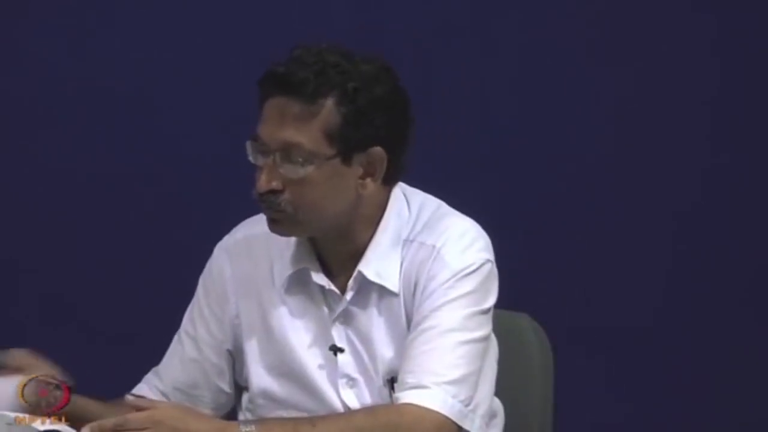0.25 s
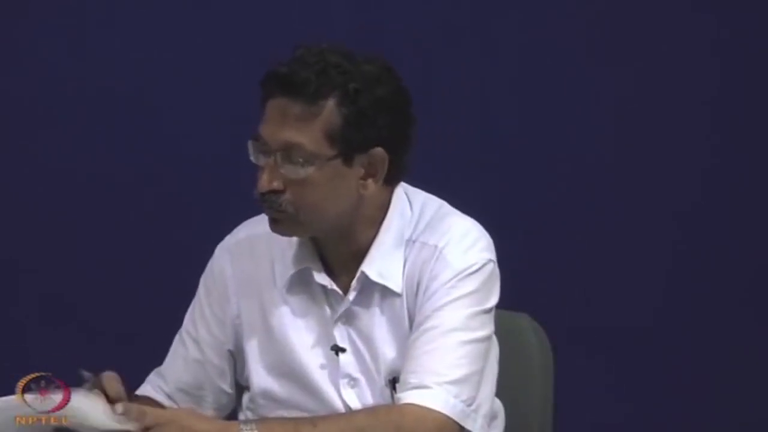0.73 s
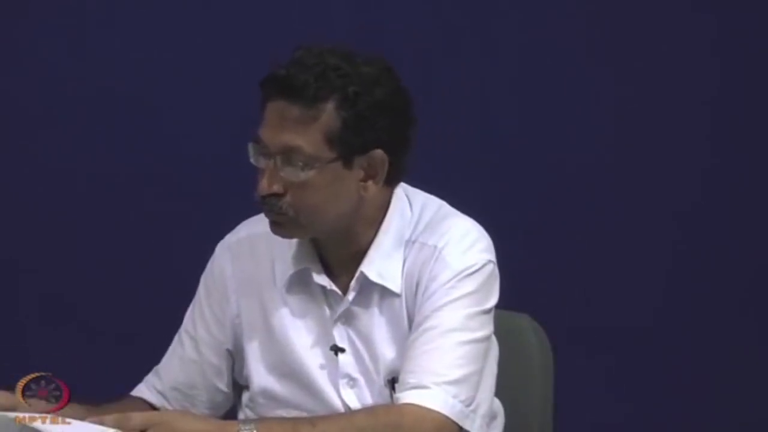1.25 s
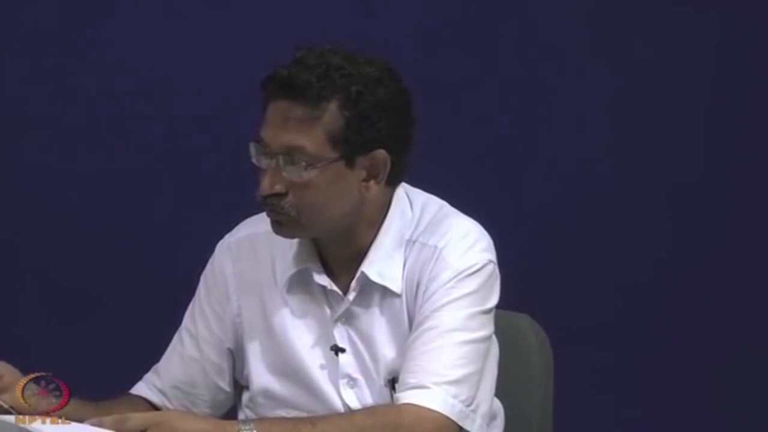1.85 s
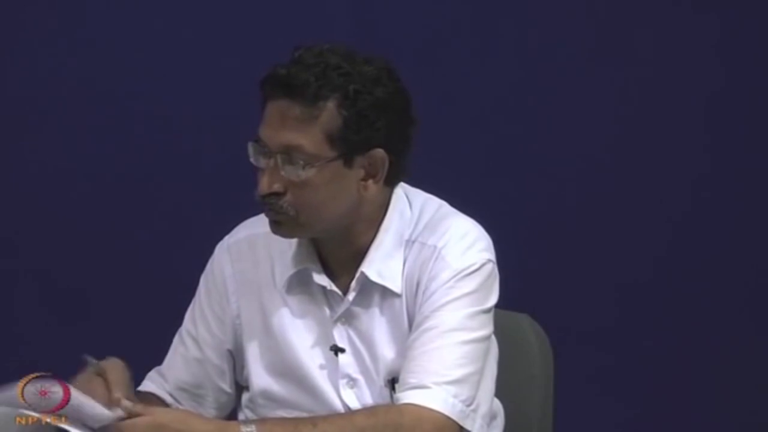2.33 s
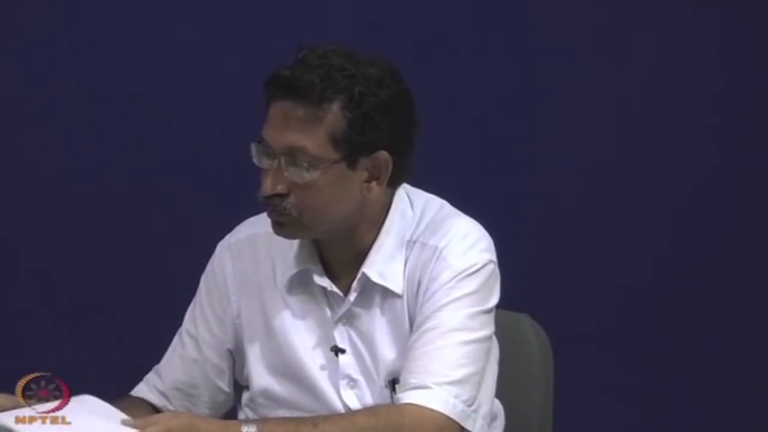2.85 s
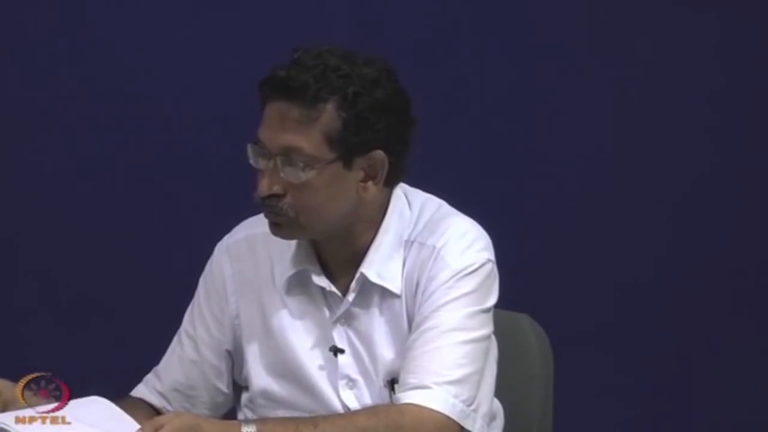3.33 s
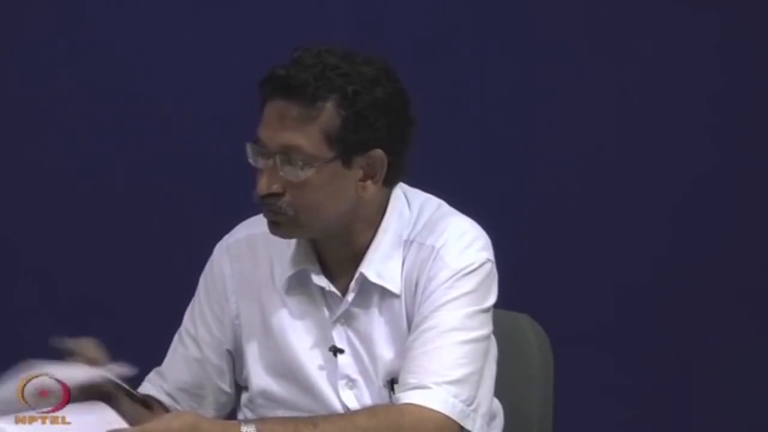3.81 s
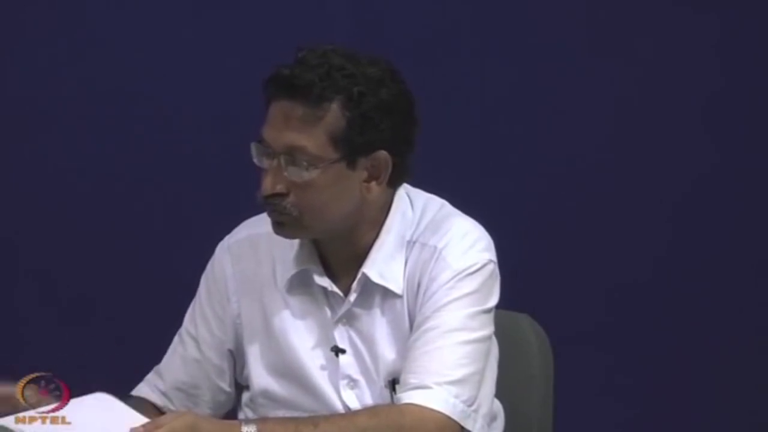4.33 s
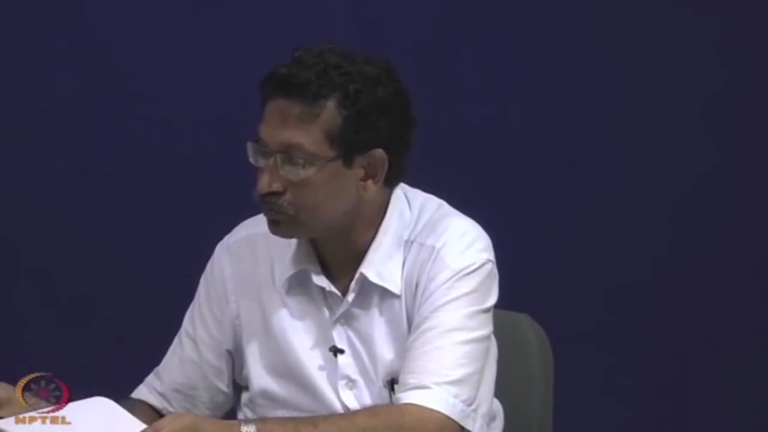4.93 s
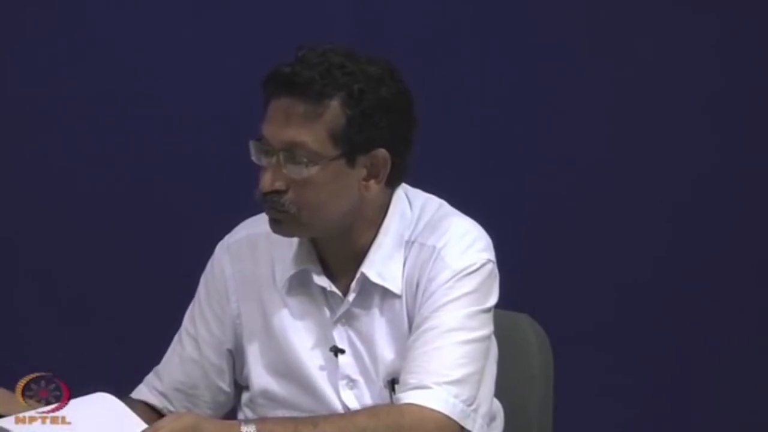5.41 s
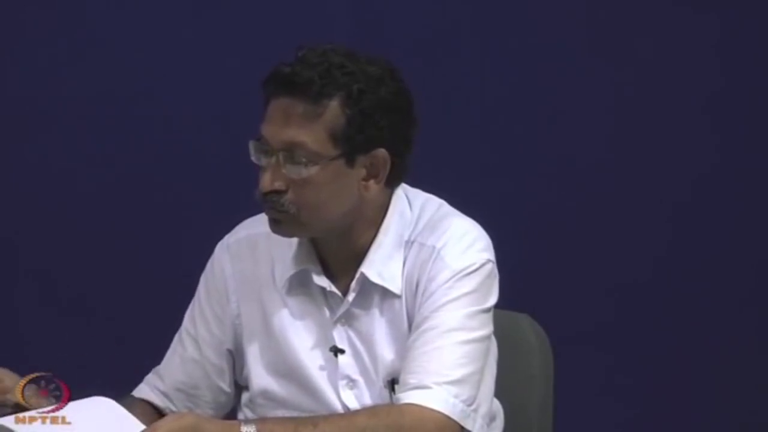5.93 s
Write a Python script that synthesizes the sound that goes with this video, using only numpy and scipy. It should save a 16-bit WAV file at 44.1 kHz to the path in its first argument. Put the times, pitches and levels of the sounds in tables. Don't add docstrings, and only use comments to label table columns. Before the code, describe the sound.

Paper sheets slide, crackle and flick on a desk in a quiet room, with one sharp slap, small knocks and low air rumble.

```python
import sys
import numpy as np
from scipy import signal
from scipy.io import wavfile
from scipy.ndimage import uniform_filter1d

SR = 44100
rng = np.random.default_rng(int(sys.argv[2]) if len(sys.argv) > 2 else 0)


def elevation(decibels):
    levels = np.asarray(decibels, float)
    return 10 ** (levels / 20)


def unload_audio(sound):
    columns = np.transpose(np.atleast_2d(sound))
    steps = np.round(np.clip(columns, -1, 1) * 32767)
    wavfile.write(sys.argv[1], SR, steps.astype(np.int16))


N = 272097
STEP = 32
FALL_DB = 12

# (f/Hz, level/dB per Hz)
WASH = [(45, -38.5), (72, 4), (95, -11), (210, -13), (315, -14.5), (550, -15.5), (800, -19.5),
        (1050, -22.5), (1800, -28), (2700, -36), (3600, -40), (6000, -45), (11000, -47.5), (16000, -38.5)]
# (f/Hz, width/Hz, level/dB)
DUCT_MODES = [
    [(27.52, 7.9, -0.5), (35.92, 10.3, -3.5)],
    [(57.64, 9, -0.5), (68, 13, -17.5)],
]
# (peak t/s, level/dB, half length/s)
SURGES = [(0.07, -48.5, 0.16), (0.415, -46.5, 0.17), (0.664, -53.5, 0.031), (0.842, -54.5, 0.12),
          (1.003, -43.5, 0.038), (1.143, -49.5, 0.1), (1.29, -50, 0.036), (1.487, -50, 0.23),
          (1.616, -53, 0.054), (1.856, -44.5, 0.023), (1.965, -46.5, 0.052), (2.144, -49, 0.16),
          (2.447, -49.5, 0.045), (2.712, -53, 0.27), (3.05, -45.5, 0.19), (3.35, -53, 0.15),
          (3.516, -54.5, 0.1), (3.67, -49, 0.11), (3.822, -50.5, 0.16), (4.166, -37.5, 0.016),
          (4.31, -45.5, 0.073), (4.502, -49, 0.47), (4.8, -52, 0.23), (5.042, -51, 0.041),
          (5.257, -52.5, 0.13), (5.57, -56.5, 0.19), (5.874, -49, 0.11), (6.048, -47.5, 0.17)]
# (peak t/s, level/dB)
THROBS = [(.05, -74), (.2, -59.5), (.5, -62), (.72, -72), (.91, -59), (1.3, -60.5), (1.51, -75),
          (1.82, -60), (2.03, -55.5), (2.2, -58), (2.589, -67), (2.84, -55), (3.1, -57), (3.27, -61),
          (3.441, -56.5), (3.9, -57), (4.2, -61), (4.38, -59), (4.62, -56), (4.8, -57.5), (4.96, -58),
          (5.15, -58.5), (5.329, -57.5), (5.47, -58.5), (5.8, -56.5), (6.1, -58)]
THROB_HALF_S = 0.13
DEEP_LULL_DB, UPPER_LULL_DB = -60, -71.5
LEAD = 6000
# (f/Hz, width/Hz, level/dB)
WHINE = [(349, 12, -72.5), (796, 16, -86)]
# (f/Hz, t60/s)
ROOM = [(250, 0.79), (1000, 0.2), (4000, 0.17), (12000, 0.1)]

# (f/Hz, width/Hz, level/dB)
WALL = [(130, 37, -7.5), (163.3, 59, -2), (185, 5.2, -3.5), (242, 91, -1.5), (297, 86, -13.5),
        (361, 81, -26.5), (385, 33, -21.5)]
# (t/s, level/dB, rise/s, t60/s, pitch factor)
THUDS = [
    (0.553, -56.5, 0.0043, 0.19, 0.75),
    (0.864, -64.5, 0.014, 0.24, 1.6),
    (3.222, -55.5, 0.031, 0.76, 0.92),
    (3.29, -78, 0.026, 0.42, 0.85),
    (3.984, -59.5, 0.013, 0.051, 1.16),
    (5.005, -59.5, 0.02, 0.41, 1.54),
    (6.014, -57, 0.011, 0.1, 1.25),
]

# (f/Hz, width/Hz, level/dB)
DESK = [
    [(1253, 770, -10.5), (1520, 600, -13)],
    [(1986, 450, -3.5), (2527, 630, -15.5), (1866, 230, -13)],
    [(840, 850, -3), (546, 320, 0), (280, 330, -4.5)],
]
# (f/Hz, width/Hz, level/dB)
CRACK = [(2840, 1800, 9.5), (4240, 1050, 2.5), (5830, 1200, 6), (7080, 1100, -2.5), (8600, 1700, -1.5),
         (11430, 3400, 12), (15770, 2400, -9.5)]
# (t/s, middle ring peak level/dB, then upper ring, crack and low ring level/dB re it)
KNOCKS = [(0.393, -76.5, -8, -24, 20), (0.55, -50.5, 2, -25, 1), (.559, -49, -8, -17, -14),
          (0.566, -40, -9, -21.5, -9), (1.0348, -48.5, -3, -40, -10), (1.0887, -63, 6.5, -22, 4.5),
          (1.8825, -59, -26, -27, -7), (1.9833, -43.5, -13, -14, -3.5), (1.9954, -37.5, -19, -9, -6),
          (2.001, -50, 4, -30, -15), (2.0038, -40.5, -6.5, -32, -16), (2.0065, -51, -4, -30, -15),
          (2.1303, -66.5, 7, -12, 6), (2.2665, -49, -2, -14, -22), (2.2715, -59, 8, -21, -20),
          (2.3225, -66, 16, -14, -12), (2.524, -62, 2, -12, 5), (2.5908, -58.5, 1, -15, 6),
          (2.9574, -63, 4.5, -16, 1), (3.9605, -51, -3, -18, -7.5), (4.1175, -61.5, 10, -17, -25),
          (4.1237, -48.5, -5, -21, -12), (4.1268, -51, 6.5, -21.5, -7), (5.0522, -66, -3, -21.5, 3.5),
          (6.0203, -70, 7, -13, 3)]
KNOCK_CRACK_HZ = 4320
# (t/s, middle ring peak level/dB, crack level/dB re it, crack f/Hz, low ring level/dB re it)
BUCKLES = [(0.0367, -56, -2.5, 3930, -3.5), (.109, -54.5, -15, 4000, -17), (.173, -65.5, -8, 4000, 11),
           (0.2485, -54, 2, 3750, -13), (0.443, -65, -8, 4500, 7), (0.8207, -56.5, -4, 5800, -1),
           (0.9258, -65, 11, 11200, -2), (1.1588, -58.5, -7, 4660, -12), (1.4754, -61.5, 8.5, 11600, -12),
           (1.768, -56.5, -2, 5350, -26), (2.119, -58, -17, 4400, -1), (2.1593, -56, -5, 5950, -8),
           (2.549, -51.5, -12, 6000, -1), (3.3905, -68.5, 13, 4440, -5), (5.823, -72, -3, 3660, 12),
           (5.998, -63.5, 10, 6000, -3)]
BUCKLE_UPPER_DB = -3
# (t/s, peak level/dB, f/Hz, width/Hz)
RINGS = [(.5545, -40.5, 2090, 230), (.5547, -43, 1320, 230), (.5547, -41, 1730, 157),
         (.5543, -40.5, 2520, 290), (.5545, -45.5, 2870, 350), (5.8865, -63, 2870, 440),
         (2.27, -63, 1130, 440), (2.598, -61, 600, 130), (.5925, -59, 1410, 200), (1.089, -60, 630, 250),
         (5.887, -59, 940, 260), (.5545, -57.5, 99, 33), (.557, -50, 285, 120), (.559, -50.5, 457, 123),
         (.568, -56.5, 299, 109.8), (.5645, -48, 1040, 180), (1.8835, -60, 1230, 250),
         (1.9965, -66, 4100, 500), (2.019, -62, 1200, 250), (2.5795, -56, 2120, 500),
         (3.24, -64.5, 121.6, 25), (5.886, -53.5, 560, 170), (5.8865, -57.5, 2250, 400),
         (5.8865, -64.5, 4100, 300), (5.5875, -66.5, 620, 90), (6.148, -50, 1350, 400)]

# (f/Hz, width/Hz, level/dB)
SLAP = [(1650, 150, -12), (2930, 180, -8), (4400, 260, -6.5), (5000, 330, -7.5), (5780, 540, -4.5),
        (6000, 170, -15), (7860, 400, -21), (8730, 720, -15.5), (9500, 480, -12), (11200, 470, -11),
        (12340, 500, -16), (13660, 550, -15), (14560, 420, -16), (15500, 360, -15)]
# (f/Hz, width/Hz, level/dB)
FLICK = [(1330, 250, 0), (2200, 270, -11), (2800, 250, -11), (4000, 420, -11), (5930, 440, -18),
         (7400, 400, -37)]
# (f/Hz, width/Hz, level/dB)
KNUCKLE = [(1240, 290, -2), (1630, 190, -14), (2200, 220, 0), (2550, 340, -16), (4570, 650, -24),
           (7500, 1300, -44), (9800, 700, -37)]
# (f/Hz, width/Hz, level/dB)
CLICK = [(1300, 140, 0.5), (2070, 176, 0.5), (4210, 360, -7.5), (5820, 310, -13), (7200, 400, -20),
         (8400, 540, -18), (9870, 450, -25)]
# (f/Hz, width/Hz, level/dB)
SNAP = [(2150, 330, -1.5), (3000, 280, -5), (4770, 270, -2), (6000, 300, -10), (7100, 240, -18),
        (8000, 280, -13), (9370, 300, -5), (10350, 350, -12), (11400, 300, -19)]
# (t/s, peak level/dB, chatter share, chatter t60/s,
# modes of desk and object (f/Hz, width/Hz, level/dB))
BLOWS = [
    (0.5549, -20, 0.072, 0.012, [(280, 81, -20), (600, 140, -13.5), (800, 110, -10.5), (1266, 130, -6), (3470, 440, -13.5)] + SLAP),
    (2.5773, -40.5, 0.17, 0.013, [(600, 230, 1), (1300, 210, -11)] + SNAP),
    (4.0027, -33, .1, 0.0055, [(280, 97, -14)] + CLICK),
    (5.8864, -44, 0.28, 0.028, [(570, 83, -3), (910, 130, 1)] + FLICK),
    (6.1476, -34.5, 0.067, 0.019, [(790, 260, -1)] + KNUCKLE),
]
DESK_BAND_HZ, DESK_LAG_S = (1100, 3100), 0.0008

# (t/s, peak level/dB, f/Hz)
POPS = [(.031, -64, 6600), (.0362, -65, 11600), (.038, -64, 7430), (.5575, -44, 5750), (.5595, -51, 8930),
        (.5635, -48, 11950), (.5672, -51, 5500), (.5705, -46.5, 8000), (0.578, -54, 5230),
        (0.583, -46, 11200), (0.583, -47, 4670), (.5898, -52, 5000), (.590, -54, 9500), (.591, -48, 1400),
        (.5955, -50.5, 10800), (.6022, -49, 10900), (.6035, -49, 5300), (.6108, -48, 11200),
        (.6115, -51, 6200), (1.4685, -64, 1500), (1.468, -68, 8000), (3.3896, -69, 2500),
        (1.9952, -54, 2800), (2.031, -58, 1300), (2.042, -57, 1100), (1.412, -65, 2000), (3.483, -62, 4510),
        (.597, -53, 2350), (.186, -60, 900), (2.167, -62, 700), (3.3905, -63.5, 4200), (2.131, -50, 790),
        (2.145, -56, 840), (2.16, -52.5, 750), (2.529, -64, 6200), (2.693, -54, 8200), (2.745, -61, 2300),
        (2.777, -60, 2450), (2.803, -65, 1600), (2.818, -64, 1590), (2.841, -59, 1680), (2.868, -58, 1690),
        (2.592, -61, 3000), (4.0163, -57, 3600), (4.028, -64, 1700), (5.899, -64, 2500),
        (6.1615, -60, 2280), (6.1665, -50, 1300)]
POP_WIDTH_HZ, POP_WIDENS = 500, 0.18
# (loudest t/s, level/dB, half length/s, f/Hz, width/Hz)
SCUFFS = [(.47, -69, 0.036, 1950, 300), (.515, -68.5, .03, 2350, 300), (.64, -71, .07, 1350, 350),
          (.72, -73, 0.055, 2200, 500), (0.71, -74, .02, 1800, 550), (2.35, -74, 0.049, 2300, 600),
          (2.82, -71.5, 0.11, 1600, 600), (3.3, -79, 0.085, 2500, 500), (4.9, -86, .05, 7500, 3500),
          (4.65, -86, .09, 7900, 4100), (5.5, -84.5, .04, 3300, 900), (5.61, -81.5, .06, 2900, 760),
          (5.74, -79, 0.12, 2840, 1700), (5.6, -74, 0.042, 660, 400), (5.88, -68, .012, 830, 1000),
          (.6, -71, .05, 2300, 500), (6.01, -76, .03, 2100, 1200), (5.96, -80, .07, 2800, 900),
          (3.8, -70, .015, 560, 710), (2.155, -72, 0.045, 770, 300), (2.285, -70, .03, 1500, 900),
          (.03, -74, .08, 170, 120)]

# (f/Hz, level/dB per Hz)
HISS = [(1650, -24), (2800, -27), (3540, -7.5), (4600, -3), (6430, -2), (7120, -4), (10200, -5.5),
        (11800, -3.5), (15100, 3), (16500, -6.5)]
# (f/Hz, level/dB per Hz)
RUB = [(350, -14), (750, -1.5), (1100, -5), (1550, -1), (2300, -3.5), (2750, -7.5), (3200, -11),
       (5000, -31.5)]
# (start t/s, hiss level/dB, coast/s, rub level/dB re hiss, edge flutter level/dB re hiss)
JERKS = [(.027, -70.5, 0.0053, 2, -15), (0.111, -76, .11, -3, -2), (0.245, -75, 0.093, 5, -6),
         (0.44, -72, 0.073, 5.5, -9), (0.554, -64.5, 0.13, 5, -5), (1.468, -73.5, 0.047, 2, -16),
         (1.882, -76, 0.042, 6.5, -6), (1.983, -79, 0.068, 10.5, -11), (2.118, -72.5, 0.016, 4, 3),
         (2.265, -65, 0.083, 4.5, -3.5), (2.521, -69, 0.081, 1, -2), (2.69, -67.5, 0.014, 1, -2),
         (3.388, -82, 0.058, 4, -19), (3.809, -75, 0.042, 3.5, -4), (4.199, -71, 0.073, -4, 0),
         (5.886, -77.5, 0.031, 13, -21)]
JERK_RISE_S = 0.0029
# (fastest t/s, hiss level/dB, half length/s, rub level/dB re hiss, edge flutter level/dB re hiss)
STROKES = [(0.506, -65.5, 0.027, -3, -3), (0.668, -71, 0.22, 1, -13), (0.813, -66, 0.022, 2.5, -7),
           (0.861, -77.5, 0.033, 9.5, 3), (1.08, -85, 0.18, 8, -1.5), (1.56, -85.5, 0.085, 5, -4),
           (1.656, -79, 0.078, 2, -8), (1.765, -79, 0.016, 1, 2), (2.175, -82.5, 0.1, 11.5, -7.5),
           (2.426, -78, 0.16, 5, -2), (2.655, -75, 0.06, 4.5, 0), (2.77, -71.5, 0.055, 2, 0),
           (2.834, -70.5, 0.074, 2, -9), (2.985, -77, 0.09, 1.5, -5), (3.085, -79, 0.16, -1, -9),
           (3.477, -73, 0.078, 1, -6), (3.606, -77, 0.11, 4, -1.5), (3.91, -82, 0.082, 8.5, -2),
           (3.994, -69, 0.039, -16, -6), (4.035, -71.5, 0.1, 5, -8), (4.297, -78, 0.24, 1, -6.5),
           (5.52, -90.5, 0.35, 4, 1), (5.737, -98, 0.12, 12, -7), (5.974, -78, 0.11, 7.5, -8)]
# (t/s, hiss level/dB)
CREEP = [(0, -88), (1.3, -91), (1.8, -89.5), (2.2, -88), (3.3, -84), (3.75, -97), (4.5, -99), (4.7, -98),
         (4.85, -100), (5.05, -90), (5.2, -86), (5.5, -89), (5.75, -82), (6.17, -93)]
CREEP_RUB_DB, CREEP_EDGE_DB = 7, -10.5


def evened(x):
    return x / np.sqrt(np.mean(x ** 2) + 1e-30)


def read(points, hz):
    f, value = np.transpose(points)
    return np.interp(np.log(hz + 1), np.log(f + 1), value)


def filled(control):
    return np.interp(np.arange(N) / STEP, np.arange(len(control)), control)


def add(mix, s, sound):
    part = mix[round(s * SR):][:len(sound)]
    part += sound[:len(part)]


def swell(s, db, rise, fall):
    t = np.arange(0, N + STEP, STEP) / SR - s
    drop_db = FALL_DB * np.minimum((t / np.where(t < 0, rise, fall)) ** 2, 20)
    return elevation(db - drop_db) ** 2


def resonate(x, hz, width):
    turn = np.exp(2j * np.pi * hz * np.arange(len(x)) / SR)
    r = np.exp(-np.pi * width / SR)
    return 2 * (turn * signal.lfilter([1 - r], [1, -r], x / turn)).real


def resonate_twice(x, hz, width):
    return resonate(resonate(x, hz, width), hz, width)


def ring(modes, blow, order=2, lag=0):
    out = 0
    for k, (f, w, db) in enumerate(modes):
        turn = np.exp(2j * np.pi * f * np.arange(len(blow)) / SR)
        r = np.exp(-np.pi * w / SR)
        late = lag if DESK_BAND_HZ[0] < f < DESK_BAND_HZ[1] else 0
        push = np.pad(blow, (late, 0))[:len(blow)]
        smooth = signal.sosfilt([[1 - r, 0, 0, 1, -r, 0]] * order, push / turn)
        out = out + (-1) ** k * elevation(db) * (turn * smooth).real / w
    return out / abs(out).max()


def patchy(points, patch_db, size, count):
    frames, hz = 4 * N // size + 5, np.fft.rfftfreq(size, 1 / SR)
    a, b, patches = rng.standard_normal((frames, len(hz), 3)).T
    patches = uniform_filter1d(patches, size=count, axis=0)
    patches = evened(uniform_filter1d(patches, size=8, axis=1))
    z = (a + 1j * b) * elevation(read(points, hz)[:, None] + patch_db * patches)
    return evened(signal.istft(z, nperseg=size, noverlap=3 * size // 4)[1][:N])


def duct_swell():
    deep = elevation(DEEP_LULL_DB) ** 2 + sum(swell(s, db, half, half) for s, db, half in SURGES)
    upper = elevation(UPPER_LULL_DB) ** 2 + sum(swell(s, db, THROB_HALF_S, THROB_HALF_S) for s, db in THROBS)
    return [filled(10 * np.log10(power)) for power in (deep, upper)]


def duct(modes, db):
    hz, draught = modes[0][0], rng.standard_normal(N + LEAD)
    lump = sum(elevation(level) * evened(resonate_twice(draught, f, w)) for f, w, level in modes)
    lump = lump / np.sqrt(uniform_filter1d(lump ** 2, size=4000) + 0.048 * np.mean(lump ** 2))
    gain = np.pad(elevation(db), (LEAD, 0), "edge")
    return resonate_twice(gain * evened(lump), hz, 35)[LEAD:]


def whine(hz, width, db):
    steady = np.sqrt(2) * np.sin(2 * np.pi * hz * np.arange(N) / SR)
    waver = evened(resonate(rng.standard_normal(N), hz, width))
    return elevation(db) * (0.83 * steady + 0.26 * waver)


def air():
    out = elevation(-67.5) * patchy(WASH, 1.5, size=2048, count=5)
    for modes, db in zip(DUCT_MODES, duct_swell()):
        out = out + duct(modes, db)
    for row in WHINE:
        out = out + whine(*row)
    return out


def room(x):
    taps = np.zeros(SR // 2)
    at = np.arange(100, len(taps) - 20, 20)
    taps[at + rng.integers(0, 20, len(at))] = rng.choice([-1., 1.], len(at))
    hz, t, z = signal.stft(taps, SR, nperseg=256)
    tail = signal.istft(z * elevation(-60 * t / read(ROOM, hz)[:, None]), SR, nperseg=256)[1]
    return signal.fftconvolve(x, tail / np.linalg.norm(tail))[:N]


def thud(db, rise, t60, factor):
    t = np.arange(SR // 2) / SR
    push = rng.standard_normal(len(t))
    boom = sum(elevation(level) * evened(resonate_twice(push, f * factor, w * factor)) for f, w, level in WALL)
    fade = elevation(db - 60 * np.maximum(t - rise, 0) / t60)
    return fade * np.minimum(t / rise, 1) * evened(boom)


def tap(peak_db, upper_db, crack_db, crack_hz, low_db, chance):
    t = np.arange(len(chance)) / SR
    softness = np.clip((-38 - peak_db) / 16, 0, 1)
    chatter = (0.05 + 0.086 * softness) * chance * elevation(-60 * t / (0.012 + 0.012 * softness))
    blow = (t == 0) + chatter
    rings = []
    for modes in DESK:
        shifted = [(f * (1 + 0.012 * chance[k]), 1.35 * w, db) for k, (f, w, db) in enumerate(modes)]
        rings.append(ring(shifted, blow, order=3))
    middle, upper, low = rings
    crack = ring([(f, w, db - 8 * abs(np.log2(f / crack_hz))) for f, w, db in CRACK], blow)
    mix = middle - elevation(upper_db) * upper + elevation(crack_db) * crack + elevation(low_db + 5.0) * low
    return elevation(peak_db - 2.5) * mix


def strike(peak_db, share, t60, modes):
    t = np.arange(3000) / SR
    blow = (t == 0) + share * rng.standard_normal(len(t)) * elevation(-60 * t / t60)
    broad = [(f, 3.9 * w, db + 20 * np.log10(w)) for f, w, db in modes]
    return elevation(peak_db) * ring(broad, blow, order=4, lag=round(DESK_LAG_S * SR))


def desk_ring(peak_db, hz, width):
    return elevation(peak_db) * ring([(hz, width, 0)], np.arange(SR // 8) == 0, order=3)


def pop(peak_db, hz):
    return elevation(peak_db) * ring([(hz, POP_WIDTH_HZ + POP_WIDENS * hz, 0)], np.arange(500) == 0, order=3)


def contacts():
    out = np.zeros(N)
    rows = [(s, db, upper, crack, KNOCK_CRACK_HZ, low) for s, db, upper, crack, low in KNOCKS]
    rows += [(s, db, BUCKLE_UPPER_DB, crack, hz, low) for s, db, crack, hz, low in BUCKLES]
    for (s, *row), chance in zip(rows, rng.standard_normal((len(rows), 2000))):
        add(out, s + 0.00033, tap(*row, chance))
    for table, sound in ((BLOWS, strike), (POPS, pop), (RINGS, desk_ring)):
        for s, *row in table:
            add(out, s, sound(*row))
    return out


def scuffs():
    out, fibres = np.zeros(N), rng.standard_normal(SR)
    for k, (s, db, half, hz, width) in enumerate(SCUFFS):
        t = np.arange(-2 * half, 2 * half, 1 / SR)
        grain = np.roll(fibres, k * 1024)[:len(t)]
        add(out, s + t[0], elevation(db - FALL_DB * (t / half) ** 2) * evened(resonate_twice(grain, hz, width)))
    return out


def crinkle(low_hz, high_hz, count, ring_s):
    out, t = np.zeros(N), np.arange(400) / SR
    for hz in np.geomspace(low_hz, high_hz, num=count):
        sizes = elevation(3.9 * np.minimum(rng.exponential(1, N), 4))
        sizes = sizes * (rng.random(N) < 22 / SR)
        grain = np.sin(2 * np.pi * hz * t) * t * np.exp(-t / ring_s)
        out += signal.oaconvolve(sizes, grain)[:N]
    return evened(out)


def handling():
    moves = [(swell(s + JERK_RISE_S, db, JERK_RISE_S, coast), *colour) for s, db, coast, *colour in JERKS]
    moves += [(swell(s, db, half, half), *colour) for s, db, half, *colour in STROKES]
    creep_s, creep_db = np.transpose(CREEP)
    creep = elevation(np.interp(np.arange(N) / SR, creep_s, creep_db)) ** 2
    hiss = creep + filled(sum(power for power, _, _ in moves))
    rub = creep * elevation(2 * CREEP_RUB_DB) + filled(sum(power * elevation(2 * db) for power, db, _ in moves))
    top = creep * elevation(2 * CREEP_EDGE_DB) + filled(sum(power * elevation(2 * db) for power, _, db in moves))
    return np.sqrt([hiss, rub, top])


def slide():
    hiss_gain, rub_gain, top_gain = handling()
    slips = elevation(3.0 * np.minimum(rng.exponential(1, N), 3))
    slips = slips * (rng.random(N) < 300 / SR)
    slips = signal.lfilter([1], [1, -np.exp(-1 / (0.0058 * SR))], slips)
    flicker = evened(1 + 0.21 * slips)
    hiss = patchy(HISS, 1.7, size=256, count=6)
    top = evened(signal.sosfilt(signal.butter(8, 10500, "high", fs=SR, output="sos"), hiss))
    body = evened(signal.sosfilt(signal.butter(8, 10500, fs=SR, output="sos"), hiss))
    rub = patchy(RUB, 2.8, size=512, count=4)
    friction = flicker * (hiss_gain * body + top_gain * top + rub_gain * rub)
    bright = elevation(-14) * hiss_gain * crinkle(4200, 13000, count=9, ring_s=0.0004)
    dull = elevation(-13.5) * rub_gain * crinkle(1275, 2580, count=6, ring_s=0.00081)
    return friction + bright + dull


def scene():
    far = np.zeros(N)
    for s, *row in THUDS:
        add(far, s, thud(*row))
    near = contacts()
    return (air() + far + near + elevation(-15.0) * room(near) + scuffs() + slide())[None]


def roll_off(x):
    return signal.sosfilt(signal.butter(12, 16810, fs=SR, output="sos"), x)


def record(dry):
    hz, t, z = signal.stft(dry[0], SR, nperseg=2048)
    band = np.floor((hz - 12060) / 690)
    for k in range(6):
        power = 2 * np.mean(abs(z[band == k]) ** 2, axis=0) * 32 / 1.5
        level_db = 10 * np.log10(power + 1e-20)
        gate_db = -98 + 1.4 * k
        z[band == k] *= np.clip((level_db - gate_db) / 0.55, 0, 1)
    gated = signal.istft(z, SR, nperseg=2048)[1][:N]
    low_pass = signal.firwin(511, 15830, window=("kaiser", 7), fs=SR)
    limited = signal.oaconvolve(gated, low_pass, "same")
    return roll_off(limited[None])


dry = scene()
out = record(dry)
unload_audio(out)
```